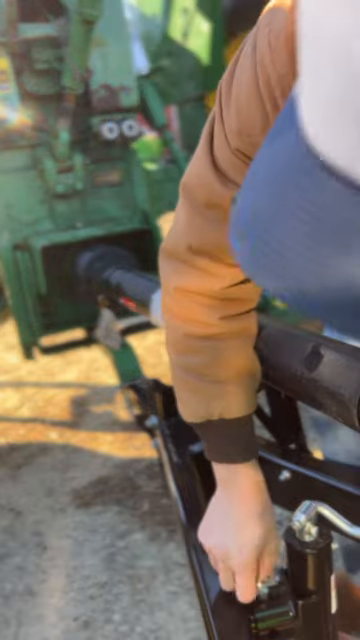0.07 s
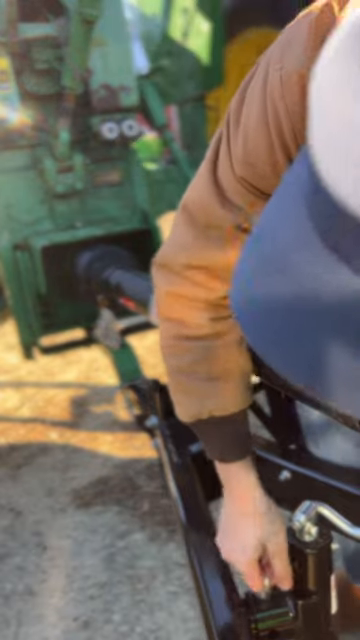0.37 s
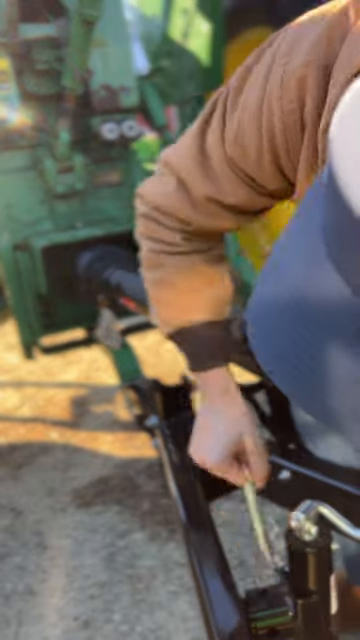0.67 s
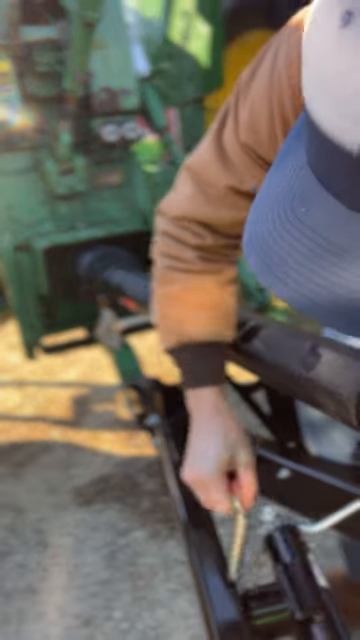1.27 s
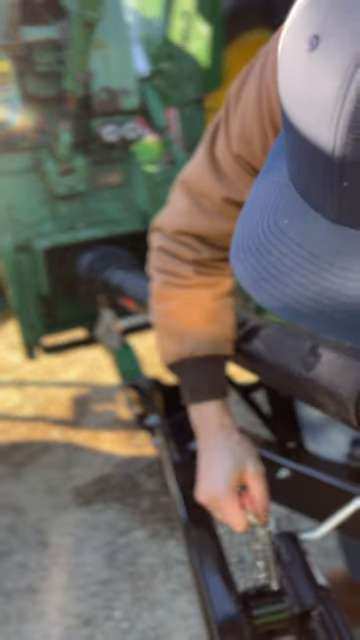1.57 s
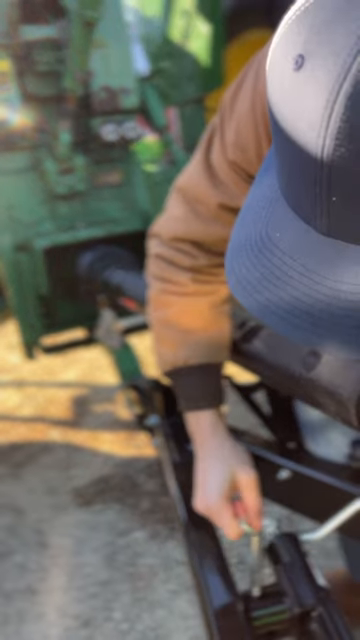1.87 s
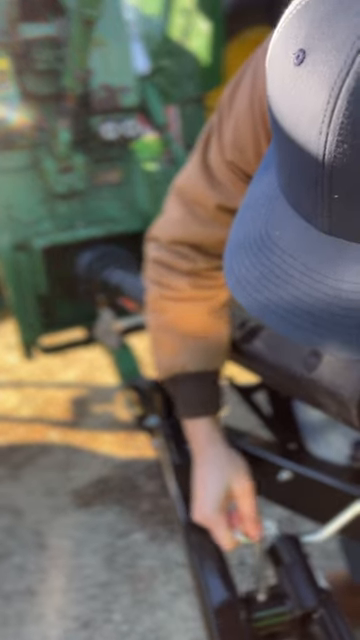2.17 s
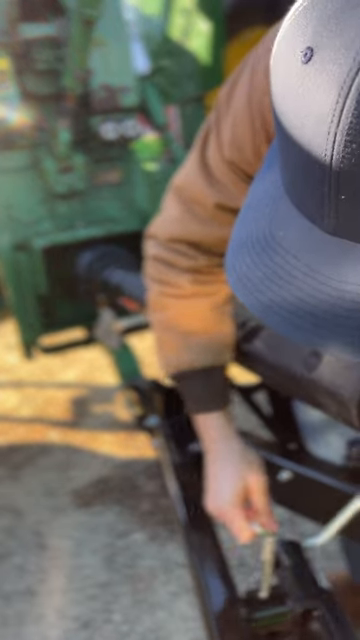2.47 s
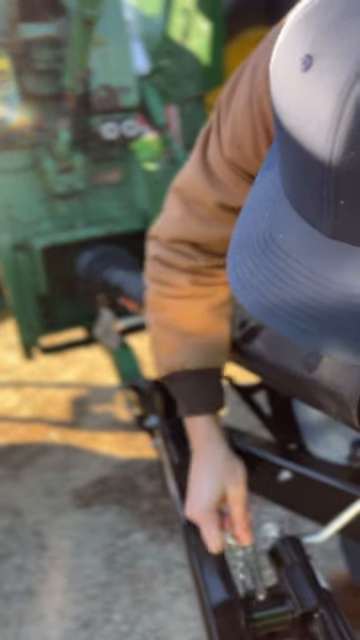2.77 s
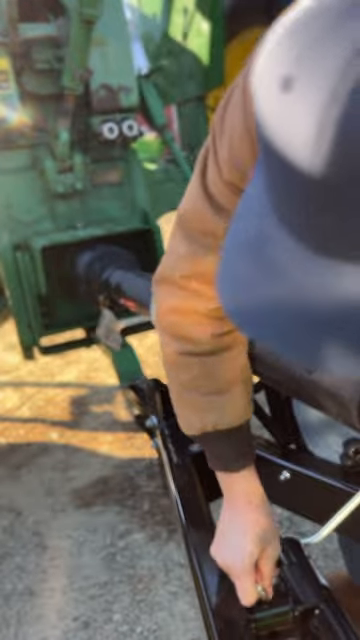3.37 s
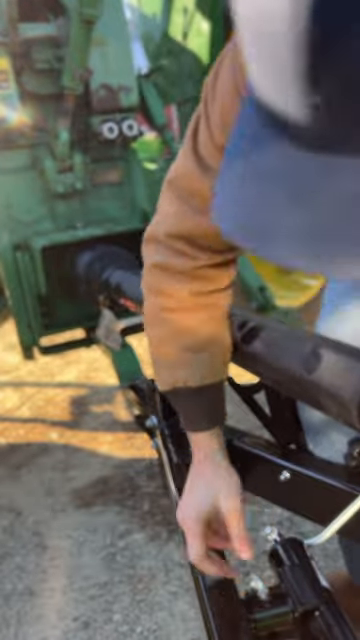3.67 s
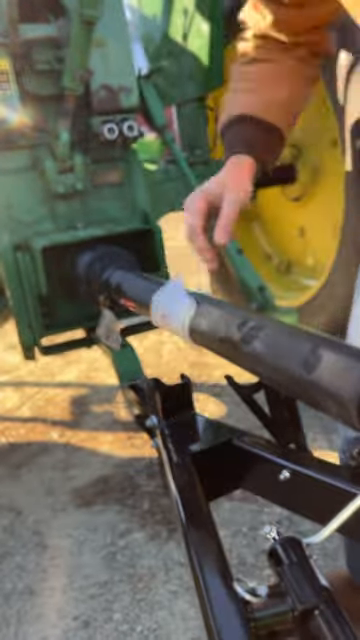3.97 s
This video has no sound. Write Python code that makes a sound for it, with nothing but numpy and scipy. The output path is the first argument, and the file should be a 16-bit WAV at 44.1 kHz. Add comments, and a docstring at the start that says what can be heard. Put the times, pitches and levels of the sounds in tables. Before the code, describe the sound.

Metal pin knocking and clinking in and out of a steel hitch, over an idling diesel.

```python
"""A diesel engine throbs steadily nearby, outdoors, and a canvas sleeve rustles as an arm moves.
Close to a stereo pair of microphones, a steel pin is drawn out of a trailer hitch, knocks about
the hole and is pushed home again. Each knock or scrape rattles the steel frame, and some set the
hollow drawbar or the whole trailer ringing. The pin's wire clip ticks against it, and the pin
itself rings when it hangs free."""
import sys
import numpy as np
from scipy import signal
from scipy.fft import rfft, irfft
from scipy.io import wavfile

SR = 44100
rng = np.random.default_rng(int(sys.argv[2]) if len(sys.argv) > 2 else 0)


def output_pcm(signal):
    """Save a mono or channel-first signal as 16-bit PCM at the path in sys.argv[1].

    Samples are clipped to [-1, 1] before scaling.
    """
    pcm = np.clip(np.atleast_2d(signal).T, -1, 1) * 32767
    wavfile.write(sys.argv[1], SR, np.round(pcm).astype(np.int16))


N = 176400
TIME = np.arange(N) / SR
RING_TIME = TIME[:SR // 2]


def from_db(db):
    """Decibels to gain."""
    return 10 ** (np.asarray(db) / 20)


def unit_rms(x):
    """Scale to rms 1."""
    return x / np.sqrt(np.mean(x ** 2) + 1e-20)


def at_hz(points, hz):
    """Read a table along log frequency."""
    pitches, values = np.transpose(points)
    return np.interp(np.log(hz), np.log(pitches), values)


def drift(rate_hz):
    """Smooth random motion of spread about 1."""
    hop = 100
    pole = np.exp(-2 * np.pi * rate_hz * hop / SR)
    noise = rng.standard_normal(N // hop + 1002)
    slow = signal.lfilter([1], [1, -2 * pole, pole * pole], noise)[1000:]
    return np.interp(np.arange(N) / hop, np.arange(len(slow)), unit_rms(slow))


def add(out, start_s, sound):
    """Mix a sound in at start_s."""
    i = max(int(start_s * SR), 0)
    out[..., i:i + sound.shape[-1]] += sound[..., :out.shape[-1] - i]


# Width at the microphones: pitch_hz, side_re_mid_db
WIDTH = [(60, -28.5), (170, -18), (350, -11), (700, 0), (1400, -7.5), (3000, -3.5), (6000, -17),
         (12000, -9)]
def spread(mid, side, hz):
    """Left and right from mid and side, wider above the bass."""
    side = side * from_db(at_hz(WIDTH, hz))
    return np.array([mid + side, mid - side])


def stereo_noise(spectrum):
    """Noise of the given colour at both microphones, rms 1."""
    hz = np.maximum(np.fft.rfftfreq(N, 1 / SR), 1)
    mid, side = rfft(rng.standard_normal((2, N)))
    return unit_rms(irfft(spread(mid, side, hz) * from_db(at_hz(spectrum, hz)), N))


def mode(hz, db, t60, rise_s=.001):
    """One dying sine, reaching each microphone with its own strength and phase."""
    t = TIME[:int(np.clip(1.5 * t60, .05, 2) * SR)]
    mics = spread(1, np.exp(2j * np.pi * rng.random()), hz)
    tone = np.imag(mics[:, None] * np.exp(2j * np.pi * hz * t))
    return tone * from_db(db - 60 * t / t60) * (1 - np.exp(-t / rise_s))


# Hum of the diesel, behind the hitch: pitch_hz, rms_db
ENGINE_TONES = [(41.3, -51.5), (58, -40), (61.8, -36), (70.5, -44.5), (75.4, -32), (114.5, -48.5),
                (123, -61.5), (127, -43.5), (150.7, -34), (154, -39.5), (226.2, -48), (265, -50.5),
                (339, -51), (376.5, -54.5)]
# Its roar and the open air: pitch_hz, relative_db
ROAR_SPECTRUM = [(20, -5), (35, -19), (55, 2), (100, 6.5), (135, 7), (190, -0.5), (300, -3.5), (450, -9.5),
                 (700, -13), (1200, -23.5), (2000, -33), (4000, -54.5), (10000, -52), (14000, -60)]
def engine(speed_wander=0.004296, throb_db=0.94, roar_db=-37.5):
    """Low tones beat together and wander with the engine's speed, over a dull roar."""
    engine_time = np.cumsum(1 + speed_wander * drift(1.108)) / SR
    hum = np.zeros(N)
    for hz, db in ENGINE_TONES:
        peak = np.sqrt(2) * from_db(db + throb_db * drift(1.33))
        hum += peak * np.sin(2 * np.pi * (hz * engine_time + rng.random()))
    return hum + from_db(roar_db) * stereo_noise(ROAR_SPECTRUM)


# Swells of the sleeve at the hitch: time_s, relative_db
RUSTLE_SWELLS = [(0,-51.5), (.3,-55.5), (.48,-44.5), (.7,-48), (.95,-58.5), (1.18,-43), (1.42,-51),
                 (1.65,-58), (1.9,-70), (2.3,-75.5), (2.45,-53.5), (2.57,-58), (2.8,-58.5), (3.25,-35),
                 (3.42,-51), (4,-49.5)]
# Colour of the canvas: pitch_hz, relative_db
CANVAS_SPECTRUM = [(500, -13), (1500, 6), (3500, 4.5), (5000, 2), (8000, 3.5), (11000, -0.5),
                   (12300, -14.5), (16000, -25.5)]
def sleeve(gain_db=-6, flicker_db=-5):
    """Canvas hisses softly and unevenly while the arm moves."""
    swell_db = np.interp(TIME, *np.transpose(RUSTLE_SWELLS))
    return from_db(swell_db + gain_db + flicker_db * drift(25)) * stereo_noise(CANVAS_SPECTRUM)


# Decay of the frame's tail: pitch_hz, t60_s
FRAME_DECAY = [(120, 1), (400, 0.49), (1000, 0.39), (2500, 0.22), (6000, 0.13), (12000, 0.1)]
FAST_LOSS_S = 0.011
def frame_modes(count=520, tail_db=-4.5):
    """The steel frame's crowded modes each lose energy fast, then ring on in a tail."""
    edges = np.linspace(np.sqrt(95), np.sqrt(16500), count + 1) ** 2
    width_hz = np.diff(edges)
    hz = edges[:-1] + width_hz * rng.random(count)
    t60 = at_hz(FRAME_DECAY, hz) * np.exp(0.11 * rng.standard_normal(count))
    angle = np.outer(2 * np.pi * hz, RING_TIME)
    decay = from_db(np.outer(-60 / t60, RING_TIME))
    decay *= (np.exp(-RING_TIME / FAST_LOSS_S) + from_db(tail_db)) / (1 + from_db(tail_db))
    return hz, width_hz, np.vstack([np.sin(angle) * decay, np.cos(angle) * decay])


# The thud, clank, clang and ping bands: low_hz, high_hz
CONTACT_BANDS = [(220, 600), (600, 1600), (2000, 4500), (5500, 10000)]
# The frame's colour on every contact: pitch_hz, gain_db
FRAME_COLOUR = [(100, -13.5), (150, -0.5), (250, -10), (500, -3), (1100, -3.5), (1400, -8), (1900, -3),
                (2500, -1), (3500, -2.5), (5000, -2.5), (6300, 2), (8200, 0.5), (9600, -2.5), (11000, -1.5),
                (13000, -12), (16000, -42)]
def strike(frame, band_db, top_hz, contact_s=.0018):
    """A contact favours some frame modes by where it lands and is too soft for those above top_hz."""
    hz, width_hz, rings = frame
    low, high = np.transpose(CONTACT_BANDS)
    density_db = np.interp(np.log(hz), np.log(low * high) / 2, band_db - 10 * np.log10(high - low))
    knots_hz = np.arange(0, SR / 2, 330)
    ripple_db = 3.5 * np.interp(hz, knots_hz, rng.standard_normal(len(knots_hz)))
    uneven = unit_rms(from_db(ripple_db + 3 * rng.standard_normal(len(hz))))
    softness = 1 / np.sqrt(1 + (hz / top_hz) ** 24)
    gain = np.sqrt(2 * width_hz) * from_db(density_db + at_hz(FRAME_COLOUR, hz)) * uneven * softness
    mid, side = np.exp(2j * np.pi * rng.random((2, len(hz))))
    drive = spread(mid, side, hz) * gain
    return np.hstack([drive.real, drive.imag]) @ rings * (1 - np.exp(-RING_TIME / contact_s))


# Pin on frame, close up: start_s, thud_db, clank_db, clang_db, ping_db, top_hz
PIN_KNOCKS = [(0.163,-59,-44,-49.5,-41,10900), (0.371,-39,-51,-34.5,-33.5,12600),
              (.377,-26,-34,-42,-38.5,12600), (0.411,-27,-34,-34,-29.5,13000),
              (0.484,-30,-38,-49,-40.5,13000), (0.523,-53,-29,-16.5,-31,10000),
              (.541,-25,-22.5,-19,-28,11100), (0.553,-28.5,-35,-20,-24.5,11000),
              (.589,-40,-39,-20,-24,11800), (.786,-24.5,-37.5,-44,-56,9000), (0.995,-62,-50,-40,-32,7800),
              (1.03,-35,-30.5,-13,-14.5,11000), (1.147,-20,-29,-25.5,-29.5,10900),
              (1.271,-48,-17,-12.5,-15.5,7200), (1.281,-25,-30,-15,-10,7400),
              (1.302,-34,-47,-18.5,-20,7000), (1.724,-39,-25,-32,-29,7300),
              (1.951,-45.5,-39,-38.5,-42.5,8000), (2.048,-44,-36,-34,-35,7500),
              (2.071,-28,-26.5,-14.5,-27,8850), (2.169,-31.5,-31,-28.5,-30.5,8800),
              (2.362,-22,-30,-18.5,-18.5,10600), (2.408,-29.5,-26,-38,-39,10900),
              (2.594,-30,-34.5,-40,-46.5,8810), (2.665,-19.5,-39,-41,-46.5,11000),
              (2.698,-27.5,-28.5,-29.5,-35.5,10800), (2.807,-52,-36,-40,-38,11450),
              (2.921,-34,-39.5,-31.5,-34,8250), (2.946,-27.5,-37,-33,-32,10800),
              (3.018,-20.5,-47,-40,-37,10200), (3.071,-26,-31,-28,-37.5,10200),
              (3.137,-22,-22,-9.5,-15,9200), (3.15,-44,-26,-12,-25,9500), (3.168,-26,-17.5,-17,-25,8700),
              (3.213,-27,-28,-28,-29.5,10000), (3.279,-46,-42,-31,-35,10300), (3.33,-19,-23,-27,-31.5,8800),
              (3.427,-28,-28,-34,-33.5,7500), (3.753,-54,-45,-42,-34,12000)]
# The hitch bracket's clear tones: pitch_hz, relative_db, t60_s
BRACKET_MODES = [(609, -19, .6), (2150, -11, .25), (2470, -5, .12), (2513, -4, .2), (2546, -13, .4),
                 (2750, -12, .2), (2855, -14, .24), (2898, -12, .18), (3137, -12, .15), (3320, -13, .15),
                 (3706, -10, .2), (3759, -12, .2)]
def knocks(frame, bracket_db=-8, vary_db=3):
    """The pin hits the hitch: the frame rattles and the bracket rings."""
    out = np.zeros((2, N))
    for start_s, thud, clank, clang, ping, top_hz in PIN_KNOCKS:
        add(out, start_s, strike(frame, np.array([thud, clank, clang, ping]), top_hz))
        for hz, mode_db, t60 in BRACKET_MODES:
            level_db = clang + bracket_db + mode_db + vary_db * rng.standard_normal()
            add(out, start_s, rng.choice([-1, 1]) * mode(hz, level_db, t60))
    return out


# Scrapes in the hole: start_s, length_s, thud_db, clank_db, clang_db, ping_db
PIN_SLIDES = [(0.528, 0.063, -26.5, -27, -27.5, -28.5), (1.018, .012, -54, -46.5, -21, -32.5),
              (1.04, 0.044, -29.5, -24, -14.5, -29.5), (1.121, 0.071, -26.5, -28, -50, -37),
              (2.064, 0.044, -42, -33, -28.5, -44.5), (2.63, 0.049, -39, -54, -48, -61),
              (2.705, 0.039, -40, -33.5, -35.5, -54), (2.79, 0.063, -30, -53, -50, -49),
              (2.938, 0.27, -28.5, -36.5, -39.5, -64), (3.14, 0.028, -60, -35, -6, -26.5),
              (3.18, .075, -60, -41, -36, -47), (3.325, 0.075, -33, -33.5, -50, -64),
              (0.367, 0.029, -33, -33, -40, -44), (0.491, 0.1, -43.5, -40, -41.5, -53)]
def slides(frame, slips_per_s=380, vary_db=6, gain_db=1):
    """The pin sticks and slips, sending dense uneven clicks into the frame."""
    out = np.zeros((2, N))
    for start_s, length_s, *band_db in PIN_SLIDES:
        ring = strike(frame, np.array(band_db), top_hz=10400)
        slipping = rng.random(len(RING_TIME)) < slips_per_s / SR
        slips = slipping * from_db(vary_db * rng.standard_normal(len(RING_TIME)))
        slips = unit_rms(slips[:int(length_s * SR)]) / np.sqrt(FAST_LOSS_S * SR)
        add(out, start_s, from_db(gain_db) * signal.fftconvolve(ring, slips[None], axes=1))
    return out


def steel_body(blows, modes, detune=.015, vary_db=2):
    """A large body rings; each mode's pitch and strength shift with how the pin bears on it."""
    out = np.zeros((2, N))
    for start_s, db in blows:
        for hz, mode_db, t60 in modes:
            shift, vary = rng.standard_normal(2)
            sign = rng.choice([-1, 1])
            add(out, start_s, sign * mode(hz * (1 + detune * shift), db + mode_db + vary_db * vary, t60))
    return out


# Knocks that reach the drawbar: start_s, level_db
DRAWBAR_KNOCKS = [(0.371, -37), (1.282, -32), (1.725, -34), (1.955, -40.5), (2.071, -37), (2.363, -41.5)]
# Its hollow tones: pitch_hz, relative_db, t60_s
DRAWBAR_MODES = [(607, -6, 0.46), (724, -10.5, 0.4), (726, -9.5, 0.2), (943, -19, 0.5), (801, 0, 0.32),
                 (890, -3.5, 0.32), (1000, -2.5, 0.24), (1094, -3.5, 0.46), (1103, -3.5, 0.46),
                 (1220, -6, 0.38), (1195, -1, 0.14), (1440, -11, 0.26), (1426, -0.5, 0.23)]
def drawbar():
    """Some knocks set the hollow drawbar ringing."""
    return steel_body(DRAWBAR_KNOCKS, DRAWBAR_MODES)


# Clip ticks, close up: start_s, low_db, middle_db, high_db
CLIP_TICKS = [(.412,-44,-49,-32), (0.594,-21.5,-29,-42), (.68,-43,-64,-50), (0.75,-39,-24,-47),
              (.788,-40,-48,-42), (.812,-42.5,-58,-60), (0.874,-24,-38,-38), (.928,-42,-51,-63),
              (.942,-45,-56,-47), (0.998,-33,-52,-48), (1.032,-43,-22,-23), (1.27,-15,-40,-55),
              (1.473,-69,-59,-50), (1.725,-31,-42,-53), (1.876,-53.5,-77,-73), (2.049,-30,-54,-67),
              (2.148,-46,-59,-45), (2.169,-26,-47,-43), (2.285,-51,-62,-55.5), (2.363,-26,-26,-52),
              (2.528,-52,-49,-75), (2.578,-44,-48,-49), (3.214,-44,-33,-37), (3.236,-50,-42,-39),
              (3.318,-29.5,-36,-29), (3.753,-43,-57,-43), (3.821,-45,-51,-56)]
# The wire's three clusters of modes: pitch_hz, relative_db, t60_s
CLIP_LOW = [(6020, -8, .035), (6390, -12, .16), (6343, -4, .07), (6455, -2, .05)]
CLIP_MIDDLE = [(7350, -6, .035), (7730, 0, .07), (8350, -7, .04), (8979, -12, .07)]
CLIP_HIGH = [(10900, -6, .02), (12520, -2, .055), (13400, -8, .015), (15800, -8, .04)]
def wire_clip(snap_db=-3, snap_s=.003, rise_s=.0006, detune=.003, vary_db=3):
    """The wire clip snaps lightly against the pin and rings, a little differently each time."""
    out = np.zeros((2, N))
    bright_band = signal.butter(3, [4500, 13000], "band", fs=SR, output="sos")
    for start_s, *levels in CLIP_TICKS:
        noise = unit_rms(signal.sosfilt(bright_band, rng.standard_normal(len(RING_TIME))))
        snap = from_db(np.mean(levels) + snap_db) * noise * np.exp(-RING_TIME / snap_s)
        tick = np.array([snap, snap])
        for db, cluster in zip(levels, (CLIP_LOW, CLIP_MIDDLE, CLIP_HIGH)):
            for hz, mode_db, t60 in cluster:
                shift, vary = rng.standard_normal(2)
                add(tick, 0, mode(hz * (1 + detune * shift), db + mode_db + vary_db * vary, t60))
        add(out, start_s, tick * (1 - np.exp(-RING_TIME / rise_s)))
    return out


# Shoves at the hitch: start_s, level_db
SHOVES = [(.55, -30), (1.15, -42), (1.281, -30.5), (2.41, -31), (3.335, -57), (3.4, -32)]
# The trailer's low tones: pitch_hz, relative_db, t60_s
CHASSIS_MODES = [(108.6, -4, 0.95), (137.6, 2, 0.96), (168.4, -16, .5), (183, -11, 1), (212.2, -10.5, 0.19),
                 (242.6, -2.5, 0.22), (319.5, -6, 0.67), (346.4, -16, .35), (451, -10, 0.21),
                 (466.3, -18, 0.38), (513, -5, 0.27)]
def chassis():
    """Shoves shake the whole trailer into a low boom."""
    return steel_body(SHOVES, CHASSIS_MODES)


# The pin hanging free, close up: start_s, mode1_db, mode2_db, mode3_db, mode4_db
PIN_RINGS = [(0.587, -50, -45.5, -71.5, -83), (1.033, -31.5, -26, -23, -26), (1.281, -30, -38, -36, -65),
             (2.073, -43, -34.5, -77, -66), (2.699, -40, -48.5, -47, -80), (3.166, -37.5, -35, -40, -70.5),
             (3.333, -46, -51, -56, -89)]
# Its bending modes: pitch_hz, t60_s, twin_offset_hz, twin_relative_db
PIN_MODES = [(1600, .62, 16, -5), (2428, .85, -7, -9), (4577, .78, 3, -14), (10329, .6, 37, -4)]
def ringing_pin():
    """The loose pin sings on in beating pairs of modes."""
    out = np.zeros((2, N))
    for start_s, *levels in PIN_RINGS:
        for db, (hz, t60, offset_hz, twin_db) in zip(levels, PIN_MODES):
            add(out, start_s, mode(hz, db, t60))
            add(out, start_s, mode(hz + offset_hz, db + twin_db, t60))
    return out


def scene():
    """Steel and sleeve close to the microphones, the engine behind."""
    frame = frame_modes()
    trailer = knocks(frame) + slides(frame) + drawbar() + chassis()
    return trailer + ringing_pin() + wire_clip() + engine() + sleeve()


def record(dry, cutoff_hz=16900):
    """The left microphone hears one sample later, and the highest treble is cut."""
    left = np.pad(dry[0], (1, 0), mode="edge")[:N]
    lowpass = signal.cheby2(12, 70, cutoff_hz, fs=SR, output="sos")
    return signal.sosfilt(lowpass, np.array([left, dry[1]]))


dry = scene()
out = record(dry)
output_pcm(out)
```